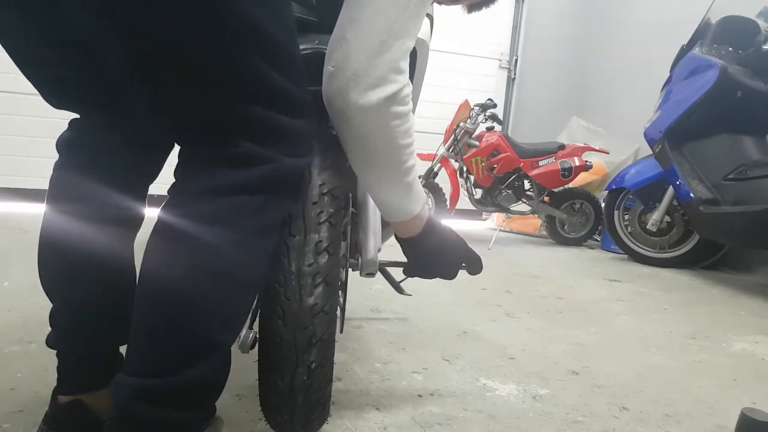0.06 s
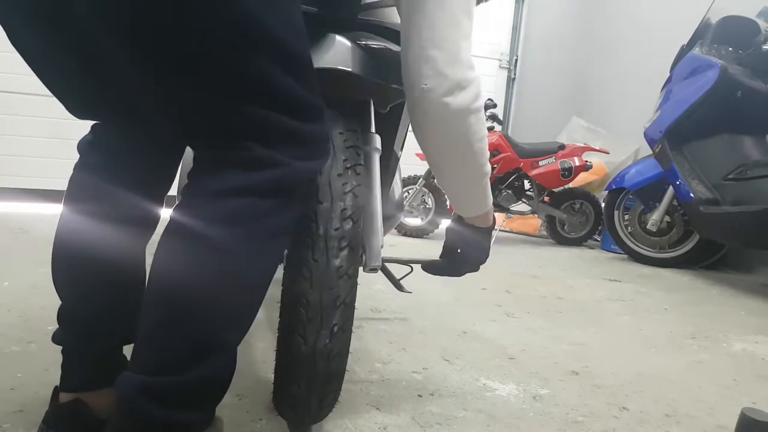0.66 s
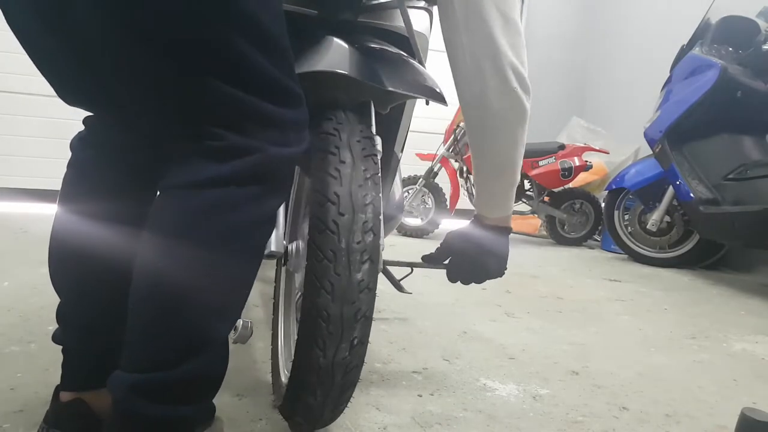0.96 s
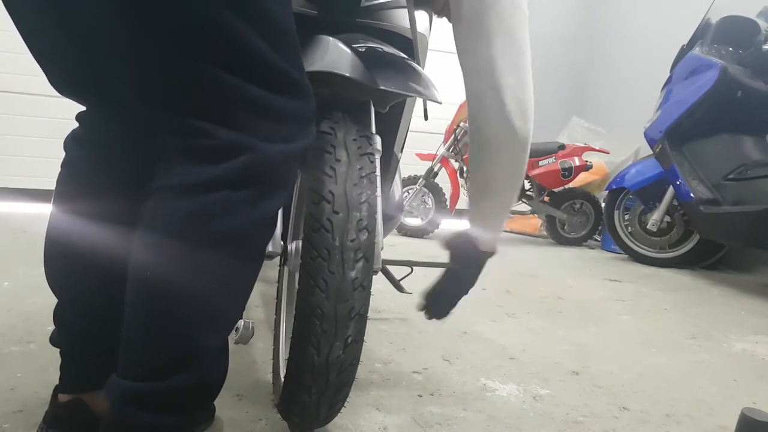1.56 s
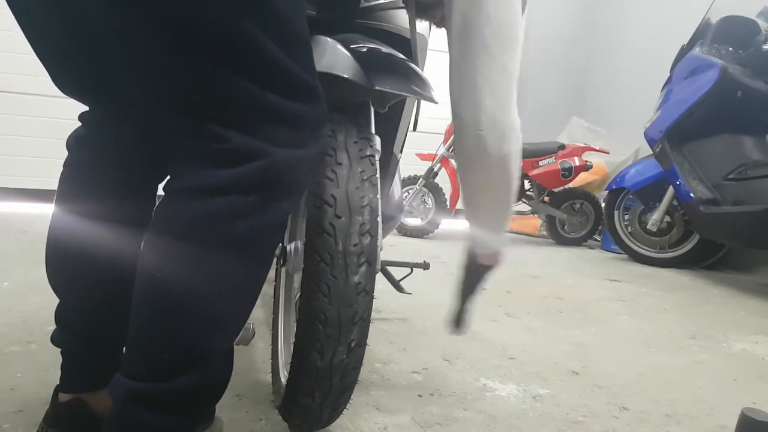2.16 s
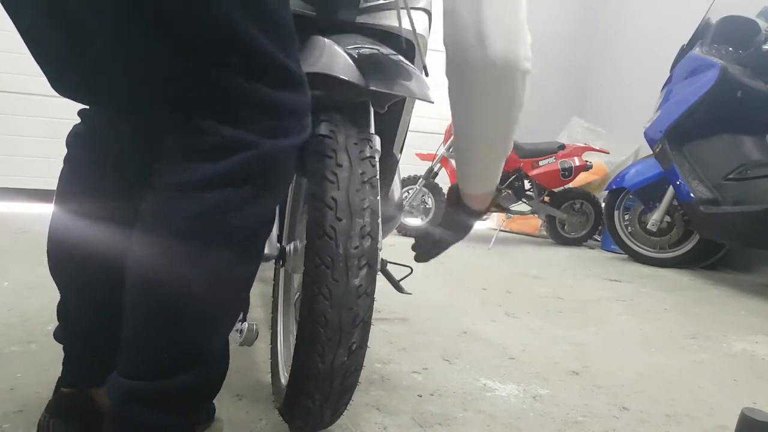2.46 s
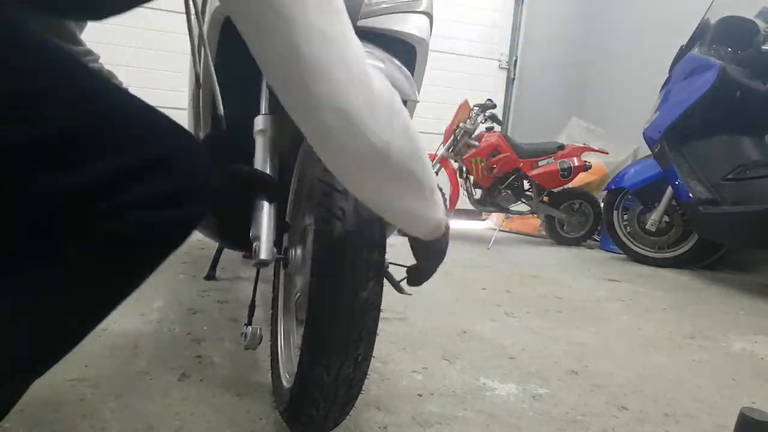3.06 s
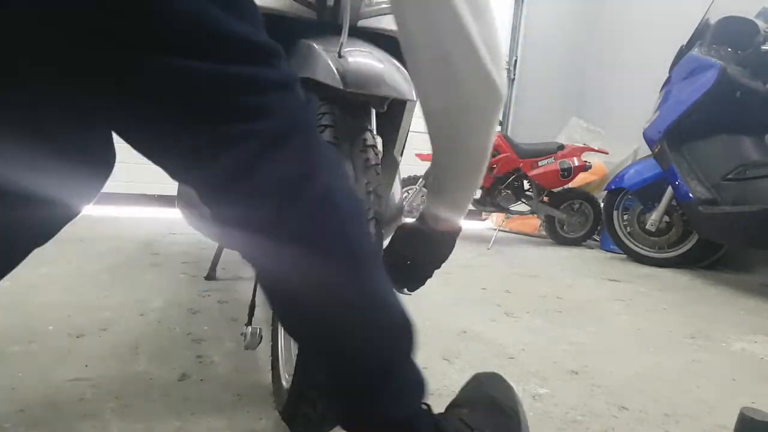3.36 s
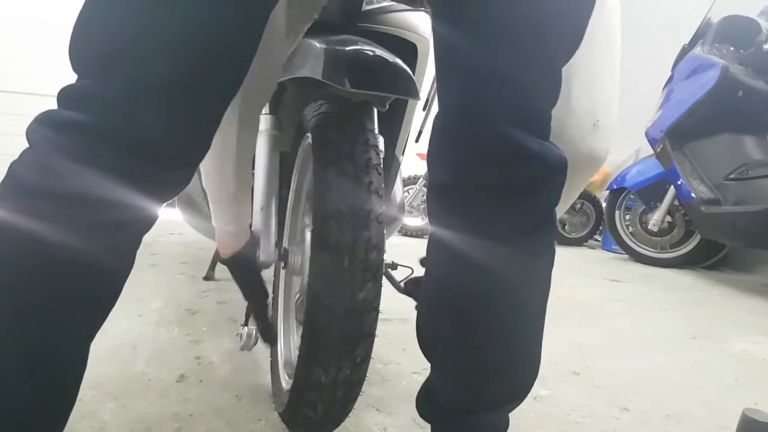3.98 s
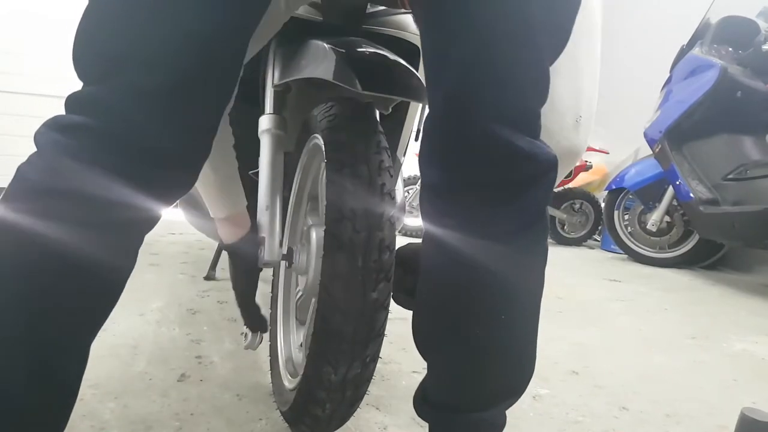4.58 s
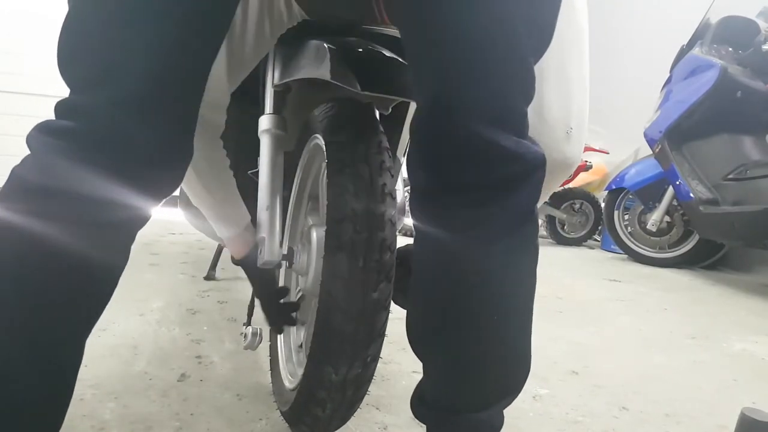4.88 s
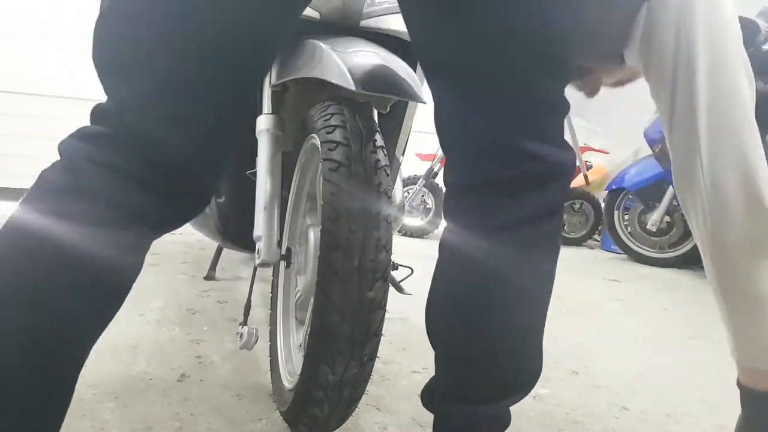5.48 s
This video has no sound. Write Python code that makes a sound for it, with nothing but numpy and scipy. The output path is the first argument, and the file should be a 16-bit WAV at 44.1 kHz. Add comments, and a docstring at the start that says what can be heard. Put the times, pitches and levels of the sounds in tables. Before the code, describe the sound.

A gloved hand taps a scraping steel axle into a scooter wheel, then thumps the wheel, with loose parts clacking in a garage.

```python
"""A steel axle is driven through a scooter's front fork and hub by a gloved palm: each impact excites its
resonances, and between taps it sticks and slips along the bore until it seats. The hand also thumps wheel and
fork leg into line, and their mass answers with a low boom. Loose parts clack; friction makes clothes rustle,
shoes scuff and the metal parts squeak faintly. The bare garage reverberates after every blow."""
import sys
import numpy as np
from scipy import signal
from scipy.fft import rfft, irfft
from scipy.io import wavfile
from scipy.ndimage import uniform_filter1d

SR = 44100
rng = np.random.default_rng(int(sys.argv[2]) if len(sys.argv) > 2 else 0)


def generate_wav(signal):
    """Clip the signal to [-1, 1] and save it as 16-bit WAV at the path in sys.argv[1]."""
    frames = np.transpose(np.atleast_2d(signal))
    scaled = np.clip(frames, -1, 1) * 32767
    pcm = np.round(scaled).astype(np.int16)
    wavfile.write(sys.argv[1], SR, pcm)


N = 252686
SIZE = 32768   # samples that hold one blow


def from_db(db):
    """Amplitude ratio of a level: tenfold for every 20 dB."""
    return 10 ** (np.asarray(db) / 20)


def freqs(size):
    """Frequencies of the Fourier bins, no lower than 1 Hz."""
    return np.maximum(np.arange(size // 2 + 1) * SR / size, 1)


def at_hz(points, hz):
    """Interpolation of (f/Hz, value) points along log frequency."""
    f, value = np.transpose(points)
    return np.interp(np.log(hz), np.log(f), value)


def peaks(modes):
    """Resonance: each mode (f/Hz, width/Hz, level/dB) adds a Lorentzian peak to a dB spectrum."""
    return sum(db / (1 + ((freqs(SIZE) - hz) / (width / 2)) ** 2) for hz, width, db in modes)


def response(db):
    """Causality: folding the cepstrum gives the minimum-phase impulse response of a dB spectrum."""
    cepstrum = irfft(np.log(from_db(db)))
    cepstrum[1:SIZE // 2] *= 2
    cepstrum[SIZE // 2 + 1:] = 0
    return irfft(np.exp(rfft(cepstrum)))[:SIZE // 2]


def add(track, s, sound):
    """Superposition: a sound joins the track at time s."""
    start = max(round(s * SR), 0)
    track[start:start + len(sound)] += sound[:N - start]


def chatter(contact_s, swell):
    """Rough contact: many tiny touches form a white burst of unit energy that swells and fades."""
    age = np.arange(SIZE // 8) / SR / max(contact_s, 1 / 2000)
    envelope = (age * np.exp(-age)) ** max(swell, 0.1)
    force = rng.standard_normal(len(age)) * envelope
    for _ in range(4):   # flatten the spectrum, then restore the envelope
        force = irfft(np.exp(1j * np.angle(rfft(force))))
        force *= envelope / np.sqrt(np.abs(uniform_filter1d(force * force, size=64)) + 1e-18)
    return force / np.sqrt(np.sum(force * force))


def blow(body_db, contact_s, low_db, high_db, swell, inertia_s, split_hz):
    """Inertia in an impact: the surfaces click first, the mass behind them follows more slowly."""
    hz = freqs(SIZE)
    colour = body_db + at_hz([(400, low_db), (1000, 0.0055), (2200, 0.0077), (6500, high_db)], hz)
    slow_share = 1 / (1 + (hz / split_hz) ** 4)
    surface = response(colour + 10 * np.log10(1 - slow_share + 1e-4))
    mass = response(colour + 10 * np.log10(slow_share + 1e-4))
    click = signal.fftconvolve(chatter(contact_s, swell), surface)
    push = signal.fftconvolve(chatter(contact_s + inertia_s, swell), mass)
    return click + push


def rub(strokes, body_db, attack_s, release_s, grain_db, grains_per_s):
    """Friction: a stream of uneven slips excites a body; each stroke sets in, holds and dies away."""
    t = np.arange(N) / SR
    pressure = np.zeros(N)
    for s, length, db in strokes:
        rise = np.clip((t - s) / attack_s, 0, 1)
        fall = np.exp(-np.maximum(t - s - length, 0) / release_s)
        pressure += from_db(db) * rise * fall
    sizes = from_db(grain_db * np.minimum(rng.exponential(1, N), 5))
    slips = rng.standard_normal(N) * sizes * (rng.random(N) < grains_per_s / SR)
    return signal.fftconvolve(pressure * slips / slips.std(), response(body_db))[:N]


def spread(mid, side):
    """Spatial coherence: two nearby points receive long waves alike and short waves differently."""
    # gain of the side signal: f/Hz, level/dB
    width = [(60, -19.5), (125, -16), (250, -14), (500, -10.5), (1000, -1.5), (4000, -1.5), (12000, -2)]
    side = irfft(rfft(side) * from_db(at_hz(width, freqs(len(side)))), len(side))
    return np.array([mid + side, mid - side])


def still_air():
    """Ambient noise: a faint, steady rumble and hiss with random phases."""
    # background spectrum: f/Hz, level/dB
    spectrum = [(15, -31), (35, 4), (180, 1.5), (400, -6.5), (550, -5.5), (1200, -13.5), (2700, -15),
                (7900, -26.5), (9300, -31), (15500, -24)]
    white = rng.standard_normal((2, N))
    mid, side = irfft(rfft(white) * from_db(at_hz(spectrum, freqs(N))), N)
    return from_db(-65.5) * spread(mid, side) / mid.std()


def clothes():
    """Sliding friction: fabric brushes along as an arm or leg moves."""
    # movements: t/s, length/s, level/dB
    rustles = [(0, 0.087, -102), (.14, 0.31, -89.5), (.56, 0.46, -88.5), (2.54, 0.24, -98.5),
               (3.0, 0.16, -94.5), (3.1, 0.2, -93.5), (3.48, 0.13, -84), (4.38, 0.03, -96),
               (5.1, 0.18, -98)]
    # response of cloth: f/Hz, level/dB
    cloth = [(50, 5), (250, 9.5), (700, 8.5), (1700, 1.5), (3000, 0.5), (5000, -7), (9500, -13),
             (15000, -10.5)]
    body = at_hz(cloth, freqs(SIZE))
    return rub(rustles, body, attack_s=0.018, release_s=0.017, grain_db=4, grains_per_s=3000)


def loose_parts():
    """Impact excitation: light parts snap together and ring in their modes, with little bass."""
    # collisions: t/s, level/dB, contact/s, bass/dB, treble/dB
    clacks = [(.003, -60.5, 0.0034, 9, -28), (0.057, -62.5, 0.0033, 8.5, -27),
              (0.258, -53, 0.0045, -8, -4.5), (.368, -54.5, 0.0069, 6, -18), (0.559, -56, 0.0014, 4, -7),
              (0.619, -45, 0.0062, 3, -3.5), (0.738, -47.5, 0.0028, 2, 6.5),
              (.749, -31.5, 0.00076, 2.5, -2.5), (.856, -41, 0.0017, 2, -11.5),
              (1.018, -41.5, 0.0046, 4.5, -5.5), (2.673, -60, 0.0068, 17, 12),
              (2.832, -40.5, 0.0068, 1.5, 6), (3.301, -64.5, 0.001, 6.5, 2), (3.324, -55.5, 0.003, 2.5, 11),
              (3.383, -27.5, 0.0084, -7.5, -2), (3.505, -43, 0.0096, -26, 1), (4.603, -36.5, 0.003, -10, 0),
              (5.038, -41, 0.0026, 1, 1.5), (5.177, -52, 0.0017, 2.5, -9)]
    # broad response of the parts: f/Hz, level/dB
    spectrum = [(60, -7.5), (250, -1.5), (400, 4.5), (900, 5.5), (1700, 10), (3000, 7.5), (5000, 0.5),
                (8000, -4), (9300, -10.5), (15000, -7)]
    # their resonances: f/Hz, width/Hz, level/dB
    modes = [(471, 52, 5.8), (810, 33, 4.7), (1421, 86, 8.9), (1525, 19, 1.7), (1656, 33, 5.7),
             (1875, 46, 10.4), (2280, 54, 2.9), (2610, 32, 6.4), (2930, 35, 2.9)]
    body = at_hz(spectrum, freqs(SIZE)) + peaks(modes)
    out = np.zeros(N)
    for s, db, contact_s, low_db, high_db in clacks:
        clack = blow(body, contact_s, low_db, high_db, swell=0.97, inertia_s=0.0071, split_hz=660)
        add(out, s, from_db(db) * clack)
    return out


def wheel():
    """Damped vibration of a heavy body: the harder the thump, the more the front end booms."""
    # blows on wheel and fork: t/s, level/dB, contact/s, bass/dB, treble/dB
    thumps = [(0.18, -68, 0.011, 6, 1), (.430, -69.5, 0.0021, 3, 7), (0.677, -57, 0.0064, 4, 2),
              (0.985, -61, 0.0095, 4.5, -1), (1.214, -61.5, 0.0052, 6, 5),
              (1.307, -68.5, 0.0034, -0.5, -11), (2.752, -49.5, 0.0032, -1.5, -3),
              (3.743, -43.5, 0.013, -1.5, -4), (3.874, -41.5, 0.0068, -5, -3.5),
              (3.889, -49.5, 0.021, 3.5, -6), (4.01, -37, 0.0014, -10, 3), (4.021, -36.5, 0.013, -1, -4),
              (4.383, -74.5, 0.0066, 10, -2), (4.583, -39.5, 0.0076, 0.5, 4.5),
              (4.601, -36, 0.0041, -6, 0.5), (4.731, -36, 0.0099, 1, 0), (4.88, -36, 0.0116, 0, -1.5),
              (5.279, -74.5, 0.0059, 6, 17)]
    # broad response of the wheel: f/Hz, level/dB
    spectrum = [(30, 16.5), (70, 31.5), (100, 28), (150, 29.5), (250, 26), (400, 23), (700, 18),
                (1050, 12.5), (1300, 9.5), (2000, 8.5), (3000, 0), (8000, -8.5), (9300, -13.5),
                (15000, -10.5)]
    # its resonances: f/Hz, width/Hz, level/dB
    modes = [(69.3, 23, 4.4), (159, 54, 3.5), (262, 23, 8.4), (437, 110, 2.6), (780, 47, 1.3),
             (1113, 48, 7.3), (1760, 110, 3.4), (2860, 290, 5.7)]
    full_boom_db, boom_per_db = -27, 0.49   # softer blows lose bass in proportion
    out, hz = np.zeros(N), freqs(SIZE)
    body = at_hz(spectrum, hz) + peaks(modes)
    for s, db, contact_s, low_db, high_db in thumps:
        boom = at_hz([(90, boom_per_db * (db - full_boom_db)), (190, 0)], hz)
        thump = blow(body + boom, contact_s, low_db, high_db, swell=1.41, inertia_s=0.0032, split_hz=1040)
        add(out, s, from_db(db) * thump)
    return out


def axle():
    """Bar modes and stick-slip: each tap rings differently as the free length shrinks; the bore damps."""
    # palm taps: t/s, level/dB, contact/s, bass/dB, treble/dB,
    # fork resonance (f/Hz, level/dB), axle ping (f/Hz, width/Hz, level/dB)
    taps = [(1.406, -42, 0.014, 3.5, -18, 235, 13.5, 6200, 300, 24),
            (1.450, -38.5, 0.0086, 3.5, -1.5, 460, 8, 6120, 300, 12),
            (1.597, -33, 0.0094, 4, 1, 565, 15, 2680, 90, 11),
            (2.092, -28, 0.0091, 1, 3, 1580, 4, 5450, 200, -7.5),
            (2.207, -36.5, 0.006, 1, 9, 186, 15, 3140, 500, 5),
            (2.2187, -28, 0.00644, 2, 7, 1700, 9, 3300, 250, 14.5),
            (2.342, -30, 0.0086, 7, -3.5, 1095, 16.5, 8760, 500, 18),
            (2.362, -30.5, 0.0067, 3.5, 3, 328, -7, 3080, 193, 9)]
    # sudden slips in the bore: t/s, level/dB, contact/s, bass/dB, treble/dB
    slips = [(1.691, -36.5, .012, -2, -18), (1.770, -49.5, 0.0041, 13.5, 2), (1.812, -37, 0.00069, -13, -5),
             (1.865, -43, 0.0038, 12.5, -2), (1.906, -38, 0.0038, -11.5, -9),
             (1.932, -39.5, 0.0051, -13, -6), (1.968, -44.5, .008, 14.5, 7.5),
             (1.986, -35.5, 0.0043, 2, -7.5), (2.031, -36, 0.003, -20, -9)]
    # sliding between catches: t/s, length/s, level/dB
    glides = [(1.665, 0.05, -77.5), (1.84, 0.036, -75.5), (2.03, .06, -79), (2.12, 0.031, -67),
              (2.40, 0.095, -85)]
    # broad response of the axle: f/Hz, level/dB
    spectrum = [(40, 1.5), (100, 9.5), (180, 16), (400, 15.5), (700, 11), (1500, 9.5), (2500, 7.5),
                (3200, 4.5), (4200, 2), (5400, -3.5), (8000, -4.5), (9300, -11.5), (15000, -11.5)]
    # its resonances: f/Hz, width/Hz, level/dB
    modes = [(174, 42, -0.5), (1413, 43, 11.5), (2580, 62, 6), (3100, 70, 11), (3370, 66, -1),
             (5170, 180, 10.5), (5435, 140, 12), (5760, 77, 7)]
    # thin ting of the shaft standing out of the fork: f/Hz, width/Hz, level/dB
    shaft = [(5445, 50, 10), (5560, 60, 7)]
    broad = at_hz(spectrum, freqs(SIZE))
    steel = broad + peaks(modes)
    gripped = broad + 0.7 * peaks(modes)   # the bore's grip lowers the peaks
    out = rub(glides, gripped, attack_s=0.015, release_s=0.015, grain_db=4.5, grains_per_s=560)
    for s, db, contact_s, low_db, high_db, fork_hz, fork_db, ping_hz, ping_width, ping_db in taps:
        standing_out = np.interp(s, [1.6, 2.35], [1, 0])
        ringing = peaks([(fork_hz, fork_hz * 0.25, fork_db), (ping_hz, ping_width, ping_db)])
        body = steel + ringing + standing_out * peaks(shaft)
        tap = blow(body, contact_s, low_db, high_db, swell=1.19, inertia_s=0.003, split_hz=1850)
        add(out, s, from_db(db) * tap)
    for s, db, contact_s, low_db, high_db in slips:
        slip = blow(gripped, contact_s, low_db, high_db, swell=1.0, inertia_s=0.00485, split_hz=370)
        add(out, s, from_db(db) * slip)
    return out


def shoes():
    """Granular friction: soles grind on dusty concrete."""
    # shifts of a foot: t/s, length/s, level/dB
    scuffs = [(2.56, 0.028, -90), (2.67, 0.055, -87), (2.768, 0.018, -74.5), (2.99, .2, -101),
              (3.29, 0.024, -80), (3.51, 0.045, -72.5), (3.575, 0.034, -75), (5.48, 0.044, -84.5),
              (5.56, .08, -89), (5.645, 0.043, -84.5)]
    # response of a sole on the floor: f/Hz, level/dB
    sole = [(60, -23), (400, -2), (1500, 5.5), (3500, 2.5), (5500, -2.5), (8000, -1.5), (9500, -7.5),
            (15000, -2.5)]
    body = at_hz(sole, freqs(SIZE))
    return rub(scuffs, body, attack_s=0.0074, release_s=0.01, grain_db=4, grains_per_s=6000)


def squeaks():
    """Friction-driven resonance: rubbing feeds one narrow mode as the axle and other parts shift."""
    # brief rubs: t/s, length/s, f/Hz, level/dB
    rubs = [(3.085, 0.11, 820, -97.5), (3.104, 0.13, 1723, -99), (4.355, 0.084, 3210, -96.5)]
    out = np.zeros(N)
    for s, length, hz, db in rubs:
        size = int(length * SR)
        tone = signal.lfilter(*signal.iirpeak(hz, Q=16, fs=SR), rng.standard_normal(size))
        add(out, s, from_db(db) * np.hanning(size) * tone / tone.std())
    return out


def reflections(build_s):
    """Diffuse reverberation: dense echoes build up, then decay exponentially at each band's own rate."""
    # reverberation time: f/Hz, T60/s
    t60 = [(60, 0.37), (160, 0.28), (420, 0.26), (1100, 0.3), (2900, 0.25), (7700, 0.17), (15000, 0.14)]
    t, hz = np.arange(SIZE) / SR, freqs(SIZE)
    white = np.exp(2j * np.pi * rng.random(len(hz)))
    build_up = 1 - np.exp(-t / build_s)
    edges = np.r_[0, np.geomspace(60, SR / 2, 26)]
    tail = np.zeros(SIZE)
    for low, high in zip(edges, edges[1:]):
        inside = (hz >= low) & (hz < high)
        fade = from_db(-60 * t / at_hz(t60, (low + high) / 2)) * build_up
        band = irfft(white * inside) * fade
        tail += band * np.sqrt(inside.mean() * np.sum(fade ** 2) / np.sum(band ** 2))
    # even out part of the random ripple, so that the standing waves set the colour
    power = np.abs(rfft(tail)) ** 2
    ripple_db = 10 * np.log10(uniform_filter1d(power, size=25) / uniform_filter1d(power, size=301))
    evenness = at_hz([(110, 0.5), (280, 0.69), (1500, 0.22), (4000, 0.32)], hz)
    return signal.fftconvolve(tail, response(-ripple_db * evenness))[:SIZE]


def garage(source, direct_db, build_s):
    """Room response: direct sound and echoes from hard walls, both coloured by standing waves."""
    # standing waves: f/Hz, width/Hz, level/dB
    modes = [(120, 18, 1.5), (223, 35, 4.4), (374.6, 36.6, 7.15), (482.5, 21, 7.8), (613, 42, 3.6),
             (719, 36, 4.2), (840, 19, 3.5), (977, 18, 8.3), (1030, 28, 1.5)]
    paths = spread(reflections(build_s), reflections(build_s))
    paths[0, 0] += from_db(direct_db)
    paths[1, 2] += from_db(direct_db)   # the direct sound reaches the right two samples later
    coloured = signal.fftconvolve(source, response(peaks(modes)))[:N]
    return signal.fftconvolve(coloured[None], paths, axes=1)[:, :N]


def scene():
    """Superposition: the work sounds from three spots, each with its own echoes, over the still air."""
    work = garage(axle(), direct_db=21, build_s=0.0019)
    work += garage(wheel(), direct_db=22.5, build_s=0.0026)
    work += garage(loose_parts() + squeaks() + shoes() + clothes(), direct_db=24, build_s=0.00053)
    balance = from_db([[-0.6], [-1.9]])   # slightly left of centre
    return work * balance + still_air()


def record(dry):
    """Band limiting: an elliptic low-pass filter cuts the top steeply."""
    cutoff_hz = 15750
    return signal.sosfilt(signal.ellip(12, 0.1, 80, cutoff_hz, fs=SR, output="sos"), dry)


dry = scene()
out = record(dry)
generate_wav(out)
```